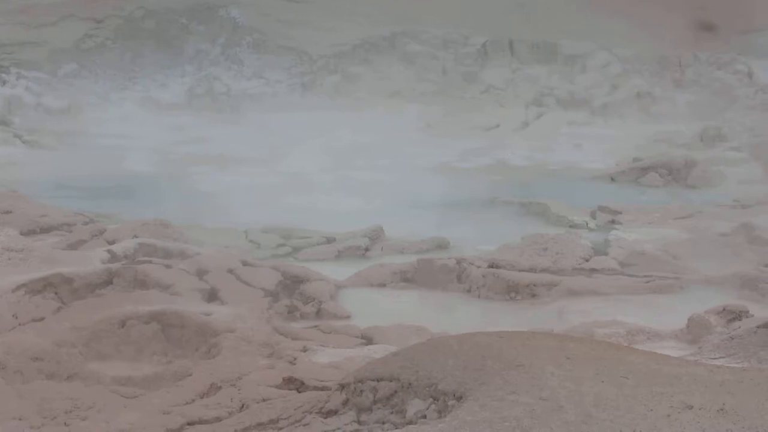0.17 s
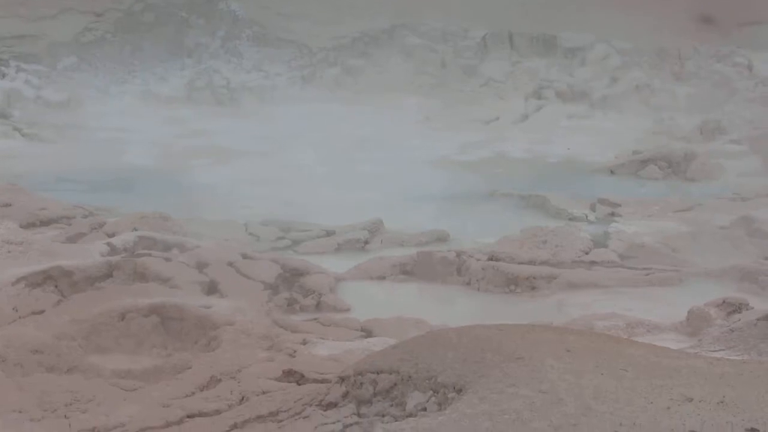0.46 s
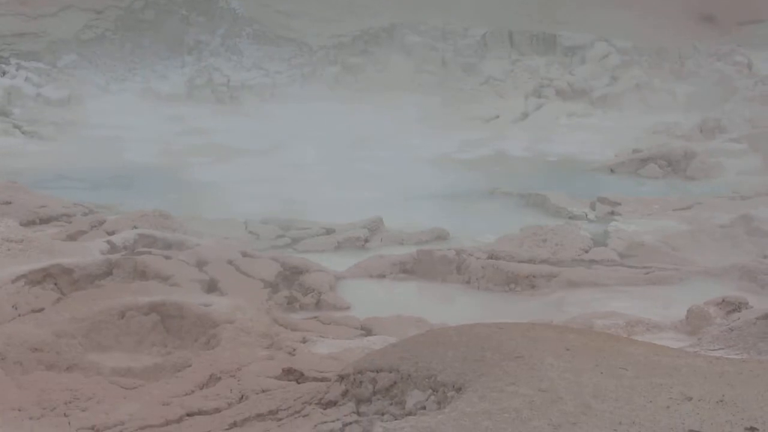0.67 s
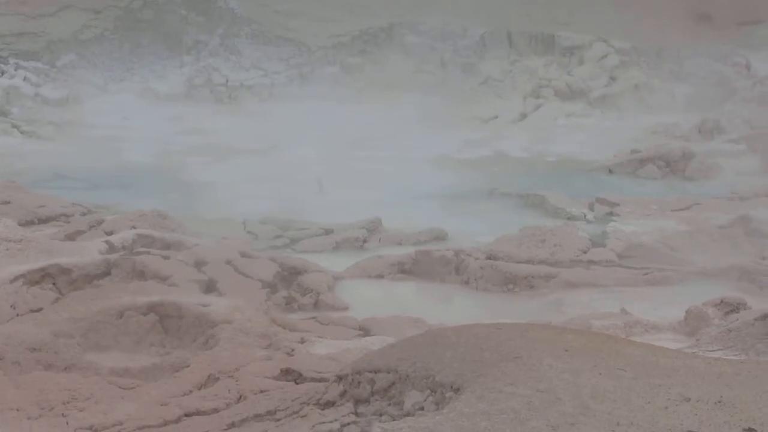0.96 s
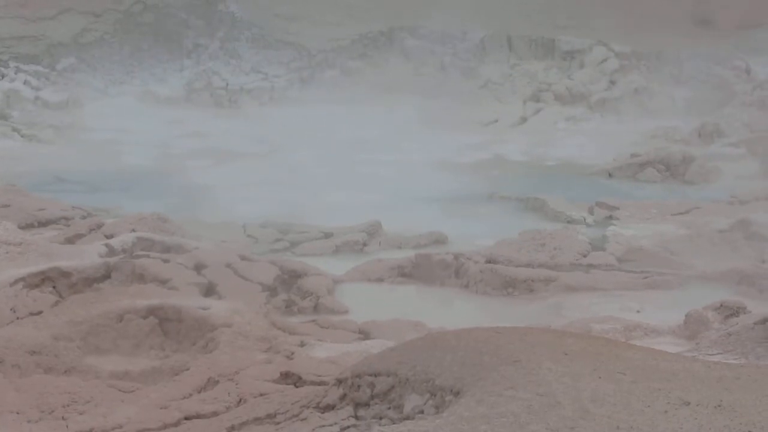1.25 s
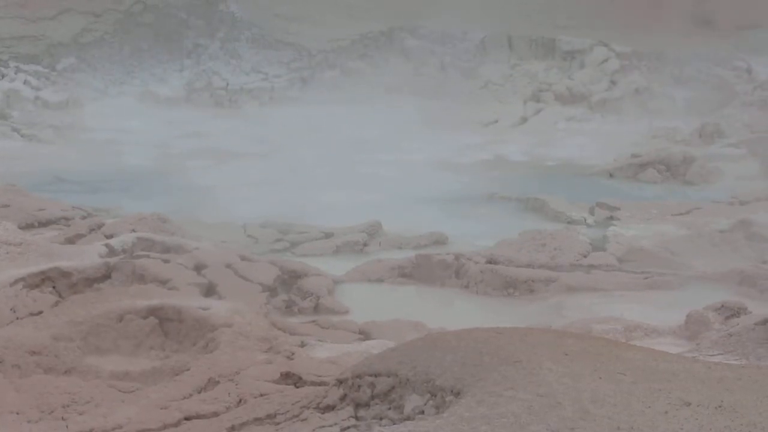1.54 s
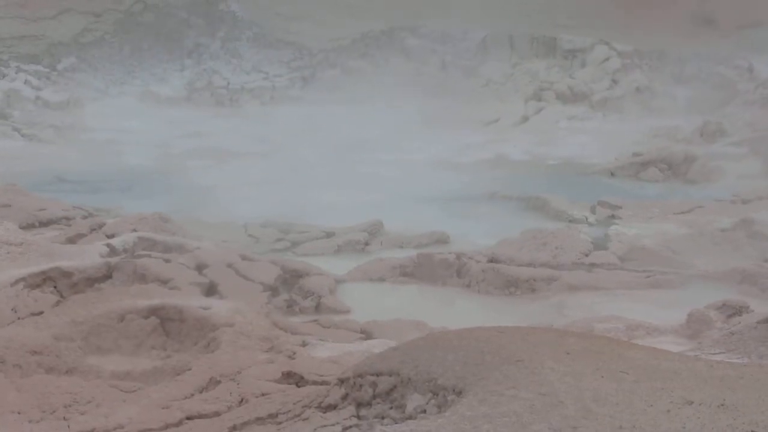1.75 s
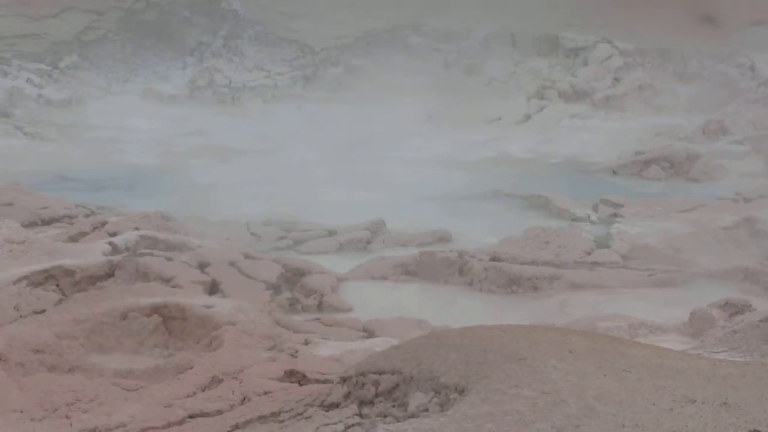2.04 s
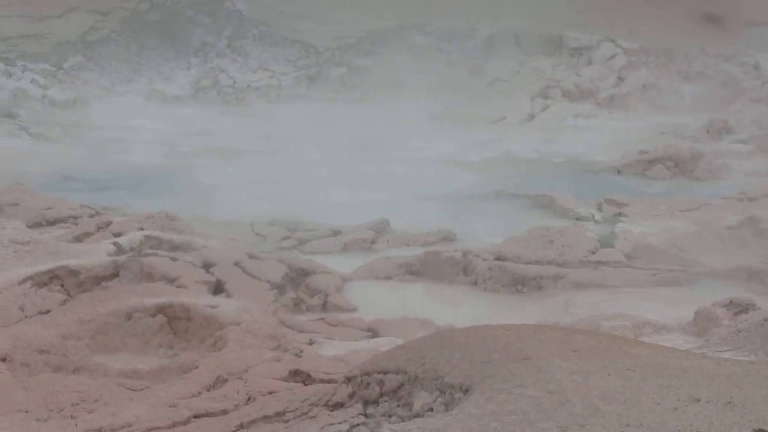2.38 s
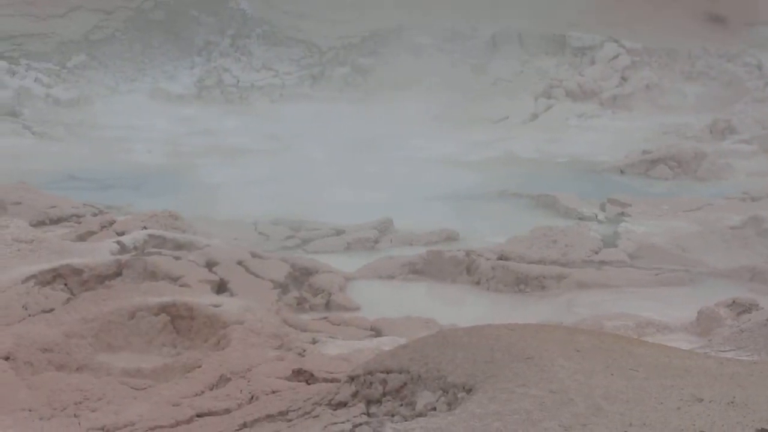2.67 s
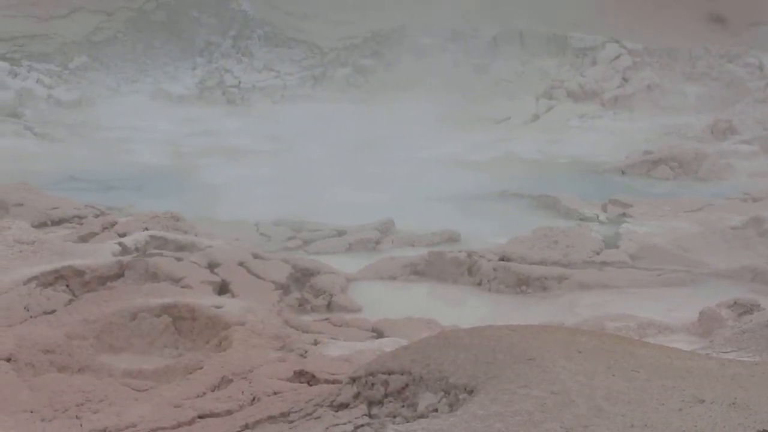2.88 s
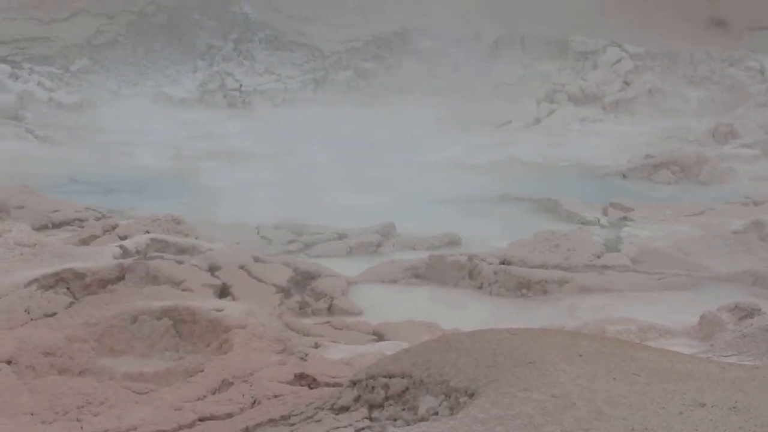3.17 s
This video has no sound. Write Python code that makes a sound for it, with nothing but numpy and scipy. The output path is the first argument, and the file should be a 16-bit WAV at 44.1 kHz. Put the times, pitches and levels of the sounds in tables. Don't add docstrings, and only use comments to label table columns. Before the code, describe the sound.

Seething hot spring water gurgles and pops close by outdoors, with thin steam hiss

```python
import sys
import numpy as np
from scipy import signal
from scipy.io import wavfile
from scipy.ndimage import uniform_filter1d

SR = 44100
rng = np.random.default_rng(int(sys.argv[2]) if len(sys.argv) > 2 else 0)


def voltage_ratio(decibels):
    exponent = np.asarray(decibels, float) / 20
    return 10 ** exponent


def wav_out(sig):
    wavfile.write(sys.argv[1], SR, np.round(np.clip(np.atleast_2d(sig).T, -1, 1) * 32767).astype(np.int16))


N = 146412


def in_time(rows):
    s, db = np.transpose(rows)
    return np.interp(np.arange(N) / SR, s, db)


def at_hz(points, hz):
    table_hz, value = np.transpose(points)
    return np.interp(np.log(hz), np.log(table_hz), value)


def rms_one(x):
    return x / np.sqrt(np.mean(x ** 2) + 1e-20)


def balance(left_over_right_db):
    return voltage_ratio(left_over_right_db / 2 * np.array([[1], [-1]]))


def drift(rate_hz):
    hop = 40
    pole = np.exp(-2 * np.pi * rate_hz * hop / SR)
    white = rng.standard_normal(N // hop + 2002)
    slow = signal.lfilter([1], [1, -2 * pole, pole * pole], white)[2000:]
    slow = slow - uniform_filter1d(slow, size=int(SR / 20 / rate_hz))
    return np.interp(np.arange(N) / hop, np.arange(len(slow)), rms_one(slow))


def bursts(per_s, uneven_db):
    size_db = uneven_db * np.minimum(rng.exponential(1, N), 4)
    sizes = voltage_ratio(size_db) * np.sign(rng.standard_normal(N))
    return rms_one(sizes * (rng.random(N) < per_s / SR)) * [[1], [0]]


def seethe(spectrum, level_db, bands_per_octave, per_s, uneven_db, grain_db, patchy_db, surge_db):
    # frequency in Hz, share.
    follows = [(40, .3), (120, 0.85), (900, 0.88), (1800, 0.58), (3500, 0.17)]
    # frequency in Hz, correlation (clipped to -1 to 1 after interpolation).
    likeness = [(40, 0.6), (125, 0.96), (350, 0.7), (1000, 0.57), (2500, 0.44), (5000, 0.03), (9000, 0.1),
                (14000, -8)]
    # frequency in Hz, left over right in dB.
    lean = [(60, -4), (130, -3.5), (290, -0.3), (630, -3), (1500, -2.5), (4000, -0.5), (8000, -3),
            (13000, 7)]
    low_hz, top_hz = spectrum[0][0], spectrum[-1][0]
    edges_hz = np.geomspace(low_hz, top_hz, int(bands_per_octave * np.log2(top_hz / low_hz)) + 2)
    surge = surge_db * drift(9.0)
    swing_db = level_db - level_db.mean()
    white = rng.standard_normal((2, 2, N))
    out = 0
    for k, (a, b) in enumerate(zip(edges_hz, edges_hz[1:])):
        if k % (bands_per_octave - 1) == 0:
            grains = bursts(per_s, uneven_db)
        hz = np.sqrt(a * b)
        sos = signal.butter(3, [a, b], "band", fs=SR, output="sos")
        mid, side = signal.sosfilt(sos, white[k % 2] + voltage_ratio(grain_db) * grains)
        alike = np.clip(at_hz(likeness, hz), -1, 1)
        pair = np.sqrt(1 + alike) * mid + np.sqrt(1 - alike) * side * [[1], [-1]]
        gain_db = at_hz(spectrum, hz) + at_hz(follows, hz) * swing_db + surge + patchy_db * drift(12.7)
        out = out + voltage_ratio(gain_db) * pair * balance(at_hz(lean, hz))
    return voltage_ratio(level_db.mean()) * rms_one(out)


def bubbles(rows, cycles, rise, attack, trim_db):
    # multiple of the pitch, level in dB.
    overtones = [(1.5, -16), (2.3, -23), (3.3, -28)]
    out = np.zeros((2, N + SR))
    for s, db, hz, *pan_db in rows:
        length = cycles / hz * SR
        u = np.arange(int(length)) / length
        shape = np.sin(np.pi * u ** attack) ** 2
        turns = cycles * (u + rise * (u * u - u) / 2) + rng.random()
        tone = 0
        for multiple, part_db in [(1, 0.014)] + list(overtones):
            if multiple * hz < SR / 3:
                tone = tone + voltage_ratio(part_db) * np.sin(2 * np.pi * multiple * turns)
        i = int(s * SR)
        out[:, i:i + len(u)] += voltage_ratio(db + trim_db) * shape * tone * balance(sum(pan_db))
    return out[:, :N]


def deep_churn():
    # time in seconds, level in dB.
    churn = [(.15, -34), (.36, -36.5), (.5, -35.5), (.62, -34.5), (.86, -36.5), (.95, -32.5), (1.1, -33),
             (1.3, -34), (1.5, -35.5), (1.68, -36.5), (1.8, -34), (2.1, -32.5), (2.24, -34), (2.4, -33),
             (2.9, -33.5), (3.1, -37.5), (3.3, -36.5)]
    # frequency in Hz, density in dB per Hz.
    deep = [(18, -33), (37, -22.5), (60, -5.5), (90, -4.5), (146, 0.5), (258, -4), (380, -10), (560, -29.5)]
    return voltage_ratio(-1) * seethe(deep, in_time(churn), bands_per_octave=3, per_s=60.0, uneven_db=2.5,
                            grain_db=-11.5, patchy_db=0.43, surge_db=0.87)


def bubble_rush():
    # time in seconds, level in dB.
    boil = [(.15, -35), (.45, -35.5), (.6, -37.5), (.85, -35.5), (1.02, -36), (1.25, -35.5), (1.5, -33.5),
            (1.8, -33), (2.1, -35), (2.25, -35.5), (2.6, -37.5), (3.0, -38), (3.3, -39)]
    # frequency in Hz, density in dB per Hz.
    rush = [(220, -47.5), (380, -11.5), (421, -7), (545, 0.5), (925, 1.5), (1230, -5), (1510, -6),
            (2380, -11.5), (3480, -19.5), (4520, -39), (7660, -120)]
    return voltage_ratio(0.84) * seethe(rush, in_time(boil), bands_per_octave=4, per_s=260.0, uneven_db=3.5,
                              grain_db=-6.0, patchy_db=1.36, surge_db=0.35)


def gulps():
    # start in seconds, peak in dB, pitch in Hz.
    belches = [(.145, -28, 182), (.227, -21, 244), (.428, -29.5, 250), (.48, -25, 170), (.66, -24, 324),
               (.754, -28, 152), (.905, -21, 220), (.92, -20, 266), (.985, -20.5, 306), (1.052, -30.5, 99),
               (1.185, -25.5, 114), (1.35, -17.5, 249), (1.579, -22, 151), (1.74, -22.5, 153),
               (1.7, -26.5, 147), (1.849, -24, 154), (1.885, -25, 147), (2.1, -31, 373), (2.39, -26.5, 110),
               (2.6, -28, 153), (2.746, -24, 162), (2.885, -22.5, 220), (2.972, -23, 125)]
    return bubbles(belches, cycles=6.2, rise=0.13, attack=0.66, trim_db=-4.0)


def glugs():
    # start in seconds, peak in dB, pitch in Hz, left over right in dB.
    low_pops = [(0.456, -24, 540, -6), (0.467, -20, 990, 4), (0.938, -21, 620, 5), (0.949, -25, 700, -2),
                (1.095, -22, 703, -4.5), (1.478, -27, 873, -8), (1.8843, -19, 960, -6),
                (1.905, -21, 970, -3), (2.096, -29, 785, -9.5), (2.294, -21.5, 1036, 0),
                (2.4222, -20.5, 694, 3), (2.425, -22.5, 696, -2), (2.433, -26, 900, -2),
                (2.831, -22, 960, -5), (2.85, -28.5, 824, 0), (2.892, -51, 415, 5.5)]
    return bubbles(low_pops, cycles=3.8, rise=0.22, attack=0.55, trim_db=-2.0)


def pops():
    # start in seconds, peak in dB, pitch in Hz, left over right in dB.
    high_pops = [(0.4353, -32, 1350, 0), (0.6639, -26, 1780, 2), (0.6968, -16.5, 1534, 2.5),
                 (0.902, -33, 1520, 4), (1.0276, -32, 1790, -1.5), (1.3926, -32.5, 1630, -11),
                 (1.8845, -21.5, 1470, 8), (2.149, -35, 1750, -5), (2.2862, -21.5, 2160, -0.5),
                 (2.412, -29.5, 1930, 0), (2.4728, -31, 1730, -10), (2.5774, -26.5, 2180, 1),
                 (2.609, -27, 1370, -1), (2.6883, -30, 1880, 2), (2.822, -25, 1720, 3),
                 (2.9235, -29, 1360, -3), (3.203, -28, 1510, 5)]
    return bubbles(high_pops, cycles=7.0, rise=0.06, attack=0.75, trim_db=-2.1)


def pips():
    # start in seconds, peak in dB, pitch in Hz, left over right in dB.
    sharp_pips = [(0.1341, -38, 2150, 2), (0.1964, -35, 2480, 4), (0.5407, -41, 2340, -1.0),
                  (0.5711, -42, 2180, 2), (0.629, -35, 2380, -1.5), (0.9682, -37, 2220, -4),
                  (0.9846, -32, 2100, -5), (1.3004, -32, 2250, 2), (2.1337, -34, 2160, -2.0),
                  (2.2496, -37, 2060, -1.0), (2.2625, -30, 2180, -2), (2.568, -36, 2200, 5),
                  (2.5968, -30, 2050, -2.0), (2.7836, -35.5, 2540, 3), (2.821, -40, 2230, 6),
                  (2.9233, -31, 2030, -9), (3.0664, -37, 2290, 7), (3.1253, -42, 2240, -4)]
    return bubbles(sharp_pips, cycles=7.0, rise=0.065, attack=0.48, trim_db=-1.0)


def droplets():
    # start in seconds, peak in dB, pitch in Hz, left over right in dB.
    ticks = [(0.213, -45, 4900, 10), (0.2752, -44, 7200, 8), (0.3259, -49, 5160, 3), (0.523, -38, 7200, -1),
             (0.4691, -39, 6890.0, -1), (0.5079, -47, 6890.0, -5), (0.5184, -56, 9300.0, -7),
             (0.5306, -53, 10340.0, -10), (0.5536, -58, 11370.0, -8), (0.6069, -48, 7240.0, 0),
             (0.6646, -36.5, 6700, -5), (0.6975, -45, 3730, 3), (0.7459, -44, 8800, -10),
             (0.9026, -56, 10340.0, 1), (1.3338, -61, 11710.0, 0), (1.3413, -44, 9800, -1),
             (1.3774, -56, 11020.0, 3), (1.3966, -43, 6890.0, -1), (1.4042, -70, 14130.0, 10),
             (1.4597, -48, 4480.0, -8), (2.0564, -49, 9000, -15), (2.1318, -44, 5440, -9),
             (2.15, -49, 6500, -8), (2.378, -56, 10000, -2), (2.435, -54, 9000, -4), (2.62, -56, 9500, -2),
             (2.694, -47, 6400, -5), (2.785, -53, 7500, -2), (2.8287, -49, 5900, -3.5),
             (2.865, -56, 10000, 0), (1.0927, -48, 7050, 2), (1.3222, -46, 5360, 1),
             (2.2182, -46, 6890.0, 0), (2.2735, -42, 6200.0, -15), (2.2868, -39, 7200, -3),
             (2.4127, -45, 6200.0, -2), (2.4736, -50, 3790.0, 2), (2.8221, -63, 4130.0, 5.5),
             (3.0543, -63, 14130.0, -7), (3.0692, -42, 5170.0, 1), (3.1793, -56, 10680.0, 3),
             (3.204, -52, 4820.0, 0)]
    return bubbles(ticks, cycles=5.5, rise=0.3, attack=0.45, trim_db=1.0)


def steam_hiss():
    # time in seconds, level in dB.
    vapour = [(.15, -54.5), (.8, -57), (1.4, -56.5), (1.8, -58), (2.3, -56.5), (3.0, -57.5), (3.3, -60)]
    # frequency in Hz, density in dB per Hz.
    steam = [(3500, -15), (4200, -1), (4900, 1), (6200, -3.5), (7600, -7.5), (10000, -16), (12000, -34),
             (15700, -35)]
    return voltage_ratio(in_time(vapour)) * seethe(steam, np.zeros(N), bands_per_octave=7, per_s=400.0, uneven_db=3.8,
                                         grain_db=-7.0, patchy_db=1.2, surge_db=1.0)


def engine():
    # multiple of the firing rate, level in dB.
    orders = [(2, -45.5), (3, -47), (4, -46.5), (5, -50), (6, -59)]
    firing_hz = 36.38
    turns = np.cumsum(firing_hz * (1 + 0.0044 * drift(1.52))) / SR
    hum = 0
    for order, db in orders:
        waver = voltage_ratio(db + 5 + 1.95 * drift(0.77))
        hum = hum + waver * np.sin(2 * np.pi * (order * turns + rng.random()))
    return hum


def scene():
    pool = deep_churn() + bubble_rush() + gulps() + glugs() + pops() + pips() + droplets()
    return pool + steam_hiss() + engine()


def whine(t):
    whine_hz, throb_hz, throb_null_s = 15734.3, 12.95, 1.083
    left_right_db = [[-85], [-101]]
    throb = np.abs(np.sin(np.pi * throb_hz * (t - throb_null_s))) ** 0.5 + 0.1
    return voltage_ratio(left_right_db) * throb * np.sin(2 * np.pi * whine_hz * t)


def top_cut(x):
    return signal.sosfilt(signal.butter(12, 15800, fs=SR, output="sos"), x)


def record(dry):
    start_s, fade_s = 0.118, 0.022
    t = np.arange(N) / SR
    ports = np.array([dry[0], np.roll(dry[1], 1)])
    fade = np.clip((t - start_s) / fade_s, 0, 1) ** 0.5
    return top_cut((ports + whine(t)) * fade)


dry = scene()
out = record(dry)
wav_out(out)
```